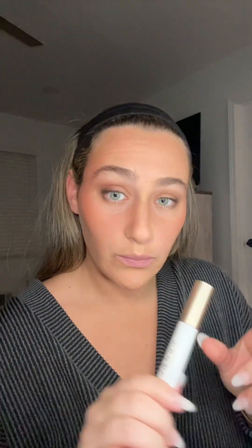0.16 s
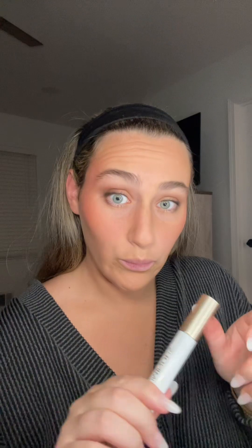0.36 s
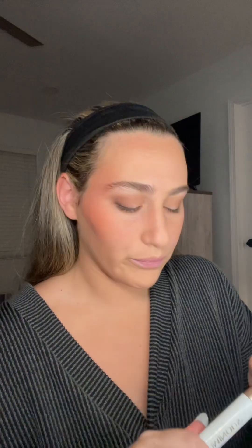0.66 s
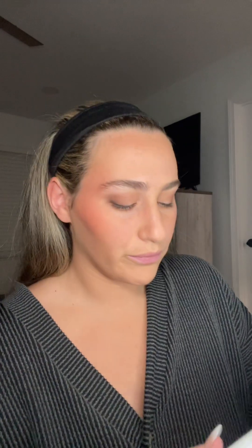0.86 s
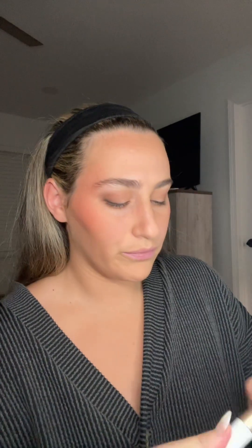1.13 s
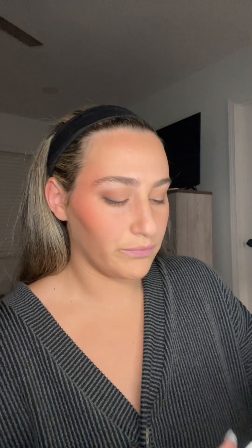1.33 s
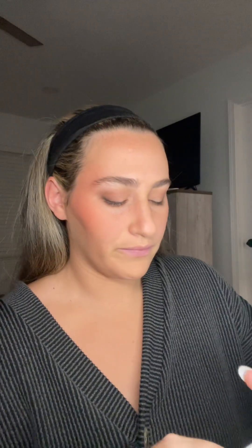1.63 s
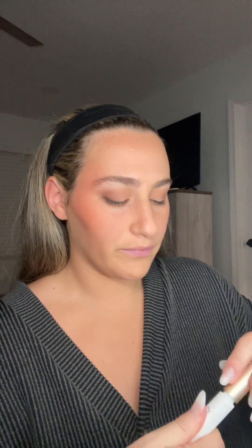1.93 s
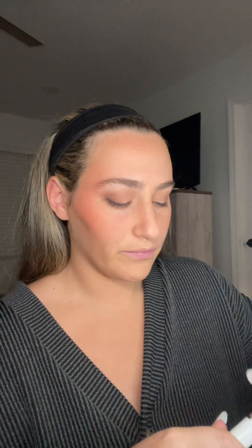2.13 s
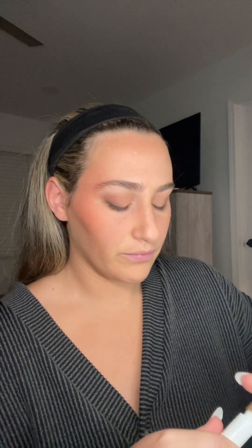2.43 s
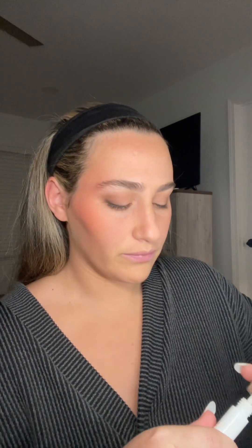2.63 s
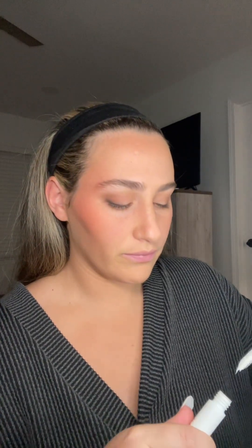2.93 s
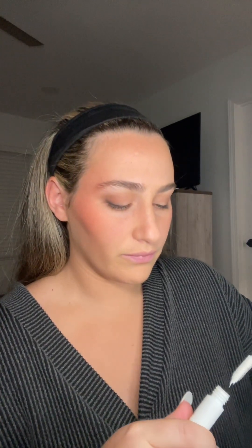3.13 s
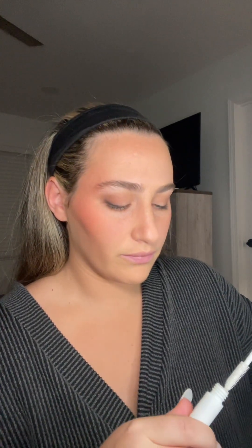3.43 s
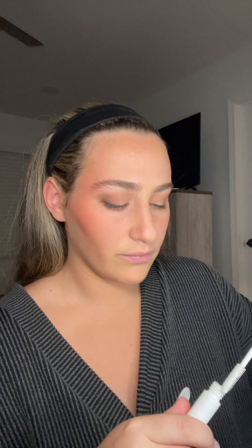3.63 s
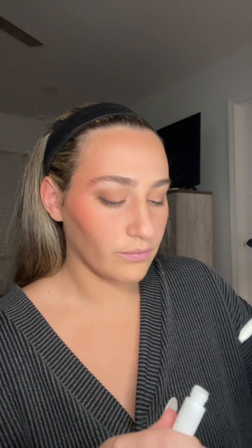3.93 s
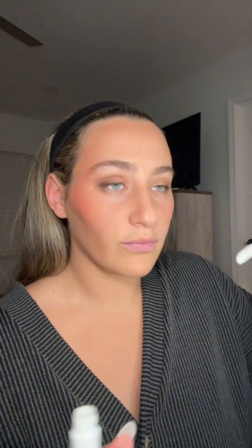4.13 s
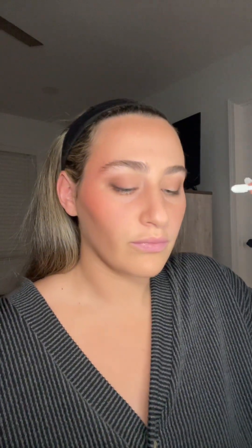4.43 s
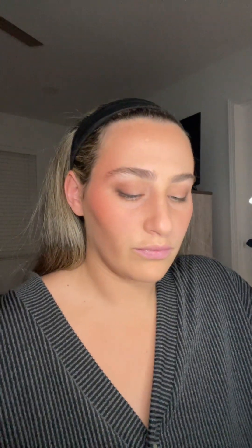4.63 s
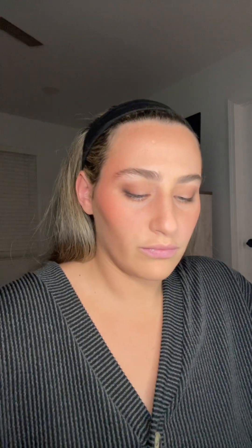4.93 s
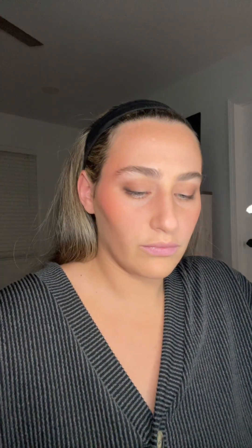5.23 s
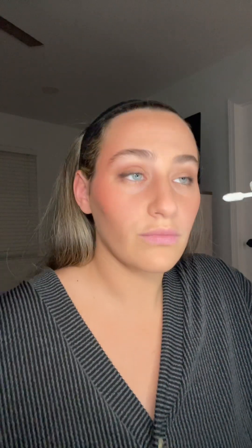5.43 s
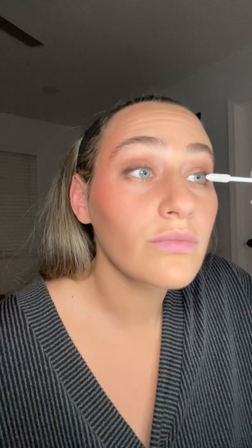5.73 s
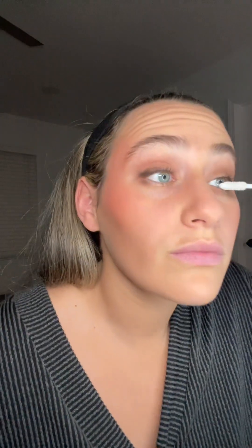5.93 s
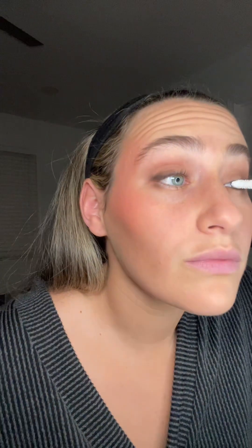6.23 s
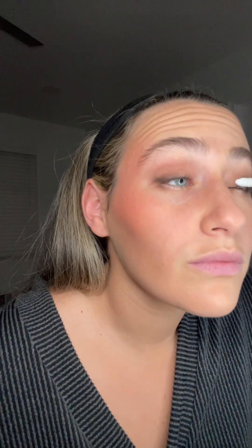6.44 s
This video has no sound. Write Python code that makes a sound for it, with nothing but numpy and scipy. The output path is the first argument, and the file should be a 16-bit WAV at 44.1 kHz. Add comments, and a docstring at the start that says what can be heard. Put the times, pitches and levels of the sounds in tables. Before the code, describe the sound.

Small plastic clicks and sliding fingers on a cosmetic tube, a snap as its wand comes out, then a light knock on a table.

```python
"""A quiet bedroom, one phone microphone close to the hands; a distant fan hums under its hiss throughout.
Sleeves rustle, skin slides over a plastic cosmetic tube, and long nails and the thread click on it.
At 2.6 s the wand is pulled out with a snap and a low pop of air. After a lull the handling resumes;
at 4.7 s the tube is set down on a table with one small bounce, and a few faint touches follow."""
import sys
import numpy as np
from scipy import signal
from scipy.fft import rfft, irfft
from scipy.io import wavfile
from scipy.ndimage import uniform_filter1d

SR = 44100
rng = np.random.default_rng(int(sys.argv[2]) if len(sys.argv) > 2 else 0)


def persist_wave(psi):
    """Save psi, clipped to +-1, as 16-bit WAV."""
    counts = np.round(np.clip(psi, -1, 1) * 32767).astype(np.int16)
    wavfile.write(sys.argv[1], SR, np.atleast_2d(counts).T)


N = 290089

# room tone and microphone hiss: f/Hz, relative density/dB
ROOM_TONE = [(65, -33), (110, -0.5), (125, -2), (200, -7), (330, -9.5), (440, -15), (520, -19), (660, -19),
             (900, -24), (1540, -31), (3200, -33.5), (5800, -35.5), (10500, -33.5), (12600, -31.5),
             (15700, -27)]
# tones of the distant fan: f/Hz, width/Hz, level/dB, depth of wavering
FAN_TONES = [(47.4, 5.4, -58.5, 0.39), (78, 12, -64.5, 1.43), (95.7, 10, -58, .9), (198.3, 14, -68.5, 1.1),
             (281.9, 14, -69.5, 1.1), (344.5, 7.3, -71, 1.1), (684, 58.6, -77, 1.5)]
# sleeve rustle: t/s, level/dB
SLEEVE_LEVELS = [(0, -77), (.3, -70.5), (1.3, -71), (2.5, -74), (2.8, -86), (3.6, -84), (4.3, -76),
                 (5.3, -75), (6.6, -86)]
# finger strokes: t/s of most pressure, rise/s, fall/s, level/dB, spot f/Hz, spread/octaves,
# hiss against rub/dB
STROKES = [(.135, .013, 0.095, -67.5, 9500, .1, 2.5), (.31, 0.049, .044, -65.5, 9500, 0.074, 5),
           (.35, 0.042, 0.21, -67.5, 7040, 0.073, -8), (.50, 0.073, 0.05, -57.5, 8250, 0.47, 2.5),
           (.631, 0.02, 0.023, -56.5, 7700, 0.26, 3.5), (.74, 0.01, .06, -60, 7000, 0.83, 3),
           (.79, .04, 0.049, -68, 4430, 0.28, -9), (.845, 0.013, .096, -66.5, 8000, 0.53, 5),
           (1.045, 0.048, 0.038, -59, 6850, 0.73, 6.5), (1.19, 0.061, 0.12, -66.5, 8200, .37, 5.5),
           (1.45, 0.017, .013, -72, 7500, .4, 7), (1.529, 0.055, .026, -61.5, 8000, .48, 3),
           (1.621, .02, 0.017, -58.5, 8350, 0.69, -4), (1.74, .06, .054, -67, 8350, .33, 4.5),
           (1.875, 0.014, .015, -62, 8500, .52, -1.5), (1.95, 0.051, 0.17, -60.5, 8300, .45, 4),
           (2.003, .008, .008, -61, 3500, .8, -5), (2.219, .025, .038, -65, 7850, .25, 2.5),
           (2.528, 0.037, 0.075, -55.5, 6970, .15, -2), (3.69, .03, .06, -71.5, 7460, .27, 3),
           (3.78, .022, .038, -79, 7800, 0.33, 7), (4.069, .051, 0.034, -68, 7220, 0.44, 7),
           (4.12, 0.01, 0.015, -53.5, 9300, 0.47, 6), (4.226, 0.065, 0.021, -63.5, 9000, 0.65, 4),
           (4.42, .052, .085, -80, 8500, .4, 9), (4.615, 0.044, .022, -68, 8120, .55, 3),
           (5.041, 0.071, 0.072, -61.5, 7550, 0.42, -3), (5.94, .0099, .03, -69, 8000, .49, -3)]
# hiss of sliding skin: f/Hz, relative density/dB
SKIN_SPECTRUM = [(5290, -37.5), (9000, -7.5), (11800, -12.5), (15100, 4), (16200, -11), (16400, -16.5),
                 (16500, -64)]
# modes of tube and cap: f/Hz, level/dB, t60/s
TUBE_MODES = [(1200, -5.5, 0.0094), (1760, -4.5, 0.0033), (2660, 0.5, 0.006), (3400, -3, 0.0065),
              (3990, -4.5, 0.0066), (4880, -2.5, .006), (5510, -2.5, 0.0037), (6300, -4.5, 0.0055),
              (6840, -4.5, 0.008), (7273, -2, .007), (8010, -7.5, 0.015), (8300, -14.5, 0.015),
              (8500, -2.5, .008), (9370, -5, 0.014), (10200, -9.5, 0.019), (11240, 0.5, 0.0065),
              (12200, -6, 0.0028), (12250, -7.5, 0.011), (12930, -9.5, 0.0053), (12910, -19.5, 0.0047),
              (14400, -5.5, 0.006956), (14045, -2, 0.01), (14950, -6, .0055), (15960, -1, .007)]
# knocks on the tube: t/s, level/dB, spot f/Hz, spread/octaves, thin rim/dB, hollow barrel/dB, barrel f/Hz
TUBE_KNOCKS = [(.1268, -43.5, 9550, .12, -12, -18, 4500), (.6126, -52, 7700, .3, -13, -5, 2620),
               (.7330, -41, 8050, .42, 1.5, -3, 3500), (.965, -47, 7730, .3, -7, -4, 3000),
               (1.0194, -45, 7400, .39, -6, -8, 3500), (1.055, -44, 5600, .34, 8.5, 4, 2800),
               (1.0945, -39.5, 6500, .37, 1.5, -15, 4000), (1.2236, -31.5, 10300, .4, -7, -2, 1700),
               (1.2304, -13, 7400, 0.38, -0.5, -22, 3670), (1.2343, -31, 15000, .2, 0, -30, 3500),
               (1.2576, -15.5, 7050, 0.26, -6, -24, 4200), (1.2605, -21, 8000, .45, -12, -24, 2800),
               (1.4417, -35.5, 7150, .48, -1, -15, 4300), (1.521, -52, 4700, .4, -2.5, 5, 2200),
               (1.549, -44, 7860, .23, -3, -19, 4000), (1.607, -43, 8690, .37, -14, -3.5, 3100),
               (1.6468, -27, 8180, 0.36, -16, -11, 2800), (1.699, -47, 7500, .4, -36, 10, 2600),
               (1.8757, -36.5, 9660, .37, -6, -7, 4800), (1.9927, -8, 11000, 0.58, -8, -27, 3320),
               (1.9942, -15, 11500, 0.27, -8, -24.5, 1800), (1.9956, -17, 8700, 0.42, -6, -23, 3300),
               (2.159, -46.5, 9050, .44, 0, -6, 4000), (2.218, -42.5, 7500, .27, -1, 12, 2700),
               (2.3636, -49, 9100, .32, -19, -10, 3500), (2.473, -49.5, 7450, .25, -7, -3, 3000),
               (2.5005, -37, 6920, .42, -5, -25, 4500), (2.5445, -32, 7000, .19, -17, -33, 4000),
               (2.5558, -6, 7033, .11, -20.5, -24.5, 4118), (3.694, -46, 7300, .4, 0, -12, 3500),
               (3.775, -49, 7700, .42, -1, 1, 2500), (4.1081, -29.5, 8700, .54, -5, -5, 4800),
               (4.2247, -32.5, 9400, .6, -11.5, -8.5, 4600), (4.3441, -44, 10400, .48, 5.5, -14, 3500),
               (4.828, -51, 7100, .16, -8, -17.5, 4000), (5.933, -47, 8700, .48, -4, -8, 3500)]
# the wand leaves the neck: t/s, level/dB
WAND_POPS = [(2.5605, -28)]
# modes of the air pocket between neck and wand: f/Hz, level/dB, t60/s
POCKET_MODES = [(129.2, -6.5, 0.049), (235.7, 1.5, 0.022), (420.6, -1.5, 0.0197), (624, -9.5, 0.023),
                (910, -16, .02), (1201, -11.5, .02)]
# the tube lands and bounces: t/s, level/dB, contact/s
LANDINGS = [(4.6725, -15, .00003), (4.6744, -27, .00003)]
# modes of table top and tube together: f/Hz, level/dB, t60/s
TABLE_MODES = [(450, -8, 0.02), (525, -9, 0.026), (623, -4, 0.02), (896, -2, 0.022), (1134, 0, 0.019),
               (1510, 2, 0.012), (1800, -5, 0.02), (2035, -6, 0.028), (2630, -11.5, 0.017),
               (3270, -10, 0.017), (4360, -13.5, 0.0075), (4700, -15, 0.0075), (5430, -1, 0.017),
               (6350, -14, 0.022), (6930, -4, 0.011), (8200, -15, .005), (9540, -11.5, 0.0083),
               (11460, -8, 0.0064), (11600, -10, 0.0076), (13340, -9, 0.01), (15250, -18, .005),
               (15100, -1, 0.0034)]
# bedroom reverberation: f/Hz, t60/s, relative level/dB
ROOM_DECAY = [(250, 0.28, 2), (1000, 0.33, 3.5), (2200, .32, -2), (4000, .26, -2), (8120, 0.25, -4),
              (15000, 0.14, 0)]
CODER_TREBLE_CUT = [(0, 0), (15800, 0), (15950, -21), (16450, -21), (16850, -40), (22050, -80)]

CRACK_T60_S = .0052  # unpitched snap of a contact
FIRST_WALL_S = .0085  # delay of the nearest wall's echo


def gain_of(db):
    return 10 ** (np.asarray(db) / 20)


def unit_rms(x):
    return x / np.sqrt(np.mean(x ** 2) + 1e-20)


def curve_at(points, hz):
    f, value = np.transpose(points)
    return np.interp(np.log(hz + 1), np.log(f + 1), value)


def add(mix, s, sound):
    part = mix[round(s * SR):][:len(sound)]
    part += sound[:len(part)]


def tint(x, gain):
    """Filter x by gain(hz); the result has unit RMS."""
    return unit_rms(irfft(rfft(x) * gain(np.fft.rfftfreq(len(x), 1 / SR)), len(x)))


def bell_db(hz, centre_hz, octaves):
    """A bell curve over pitch: a spot on the tube drives the modes near its own pitch best."""
    return -6 * (np.log2((hz + 1) / centre_hz) / max(octaves, .05)) ** 2


def ring(modes, contact_s, weight_db=0, detune=0, damped_db=-6):
    """Dying sines of alternate sign that build up while the contact lasts; peak 1."""
    hz, db, t60 = np.transpose(modes)[:, :, None]
    t = np.arange(4096) / SR
    sign = (-1.) ** np.arange(len(modes))[:, None]
    hz = hz * (1 + detune * rng.standard_normal((len(modes), 1)))
    fade = gain_of(-60 * t / t60)
    fade += gain_of(damped_db - 60 * t / (.26 * t60))  # a finger damps part of the ring at once
    sound = (sign * gain_of(db + weight_db) * fade * np.sin(2 * np.pi * hz * t)).sum(0)
    sound *= (1 - np.exp(-t / contact_s)) ** 2
    return sound / abs(sound).max()


def room_tone_and_fan(air_db=-57.5):
    """Room air and microphone hiss, with far-off fan tones that drift in phase and waver in level."""
    out = gain_of(air_db) * tint(rng.standard_normal(N), lambda hz: gain_of(curve_at(ROOM_TONE, hz)))
    t = np.arange(N) / SR
    for hz, width, db, waver in FAN_TONES:
        pole = np.exp(-np.pi * width / SR)
        sway = rng.standard_normal(N) + 1j * rng.standard_normal(N)
        for _ in range(2):
            sway = signal.lfilter([1], [1, -pole], sway)
        tone = sway * abs(sway) ** (waver - 1) * np.exp(2j * np.pi * hz * t)
        out += gain_of(db) * unit_rms(tone.real)
    return out


def sleeve_rustle():
    """Knitted cloth moves with the arms: a faint band of high noise."""
    s, db = np.transpose(SLEEVE_LEVELS)
    cloth = tint(rng.standard_normal(N), lambda hz: gain_of(bell_db(hz, centre_hz=7300, octaves=.63)))
    return cloth * gain_of(np.interp(np.arange(N) / SR, s, db))


def skin_slides(far_modes_db=-13.5):
    """Dense tiny slips of skin: part rings the tube round the rubbed spot, part hisses above it."""
    out = np.zeros(N)
    for s, rise, fall, db, spot_hz, spread, hiss_db in STROKES:
        def rubbed_tube(hz):
            modes = sum(gain_of(mode_db) / np.hypot(1, (hz - f) / 250) for f, mode_db, _ in TUBE_MODES)
            return modes * gain_of(np.maximum(bell_db(hz, spot_hz, spread), far_modes_db))
        t = np.arange(-2 * rise, 2.5 * fall, 1 / SR)
        pressure = np.exp(-(t / np.where(t < 0, rise, fall)) ** 2)
        rub_noise, hiss_noise, grit_noise = rng.standard_normal((len(t), 3)).T
        grit = gain_of(2.5 * unit_rms(uniform_filter1d(grit_noise, 90)))  # slips come in uneven clumps
        rub = tint(rub_noise, rubbed_tube)
        hiss = gain_of(hiss_db) * tint(hiss_noise, lambda hz: gain_of(curve_at(SKIN_SPECTRUM, hz)))
        add(out, s + t[0], gain_of(db) * (rub + hiss) * pressure * unit_rms(grit))
    return out


def tube_clicks(contact_s=.00015, crack_db=-2, chatter_db=-6.5, chatter_t60_s=.023):
    """Nails, thread and stopper knock the tube: a dry crack, a ring, a moment of rough slipping."""
    out, t = np.zeros(N), np.arange(1024) / SR
    mode_hz = np.array(TUBE_MODES)[:, :1]
    for s, db, spot_hz, spread, rim_db, barrel_db, barrel_hz in TUBE_KNOCKS:
        def drive(hz):
            spot = gain_of(np.maximum(bell_db(hz, spot_hz, spread), np.where(hz > 5000, -25, -60)))
            rim = gain_of(rim_db) * (hz > 12000)
            barrel = gain_of(barrel_db + bell_db(hz, barrel_hz, octaves=.48))
            return spot + rim + barrel
        crack_noise, slip_noise = rng.standard_normal((len(t), 2)).T
        drive_db = 20 * np.log10(drive(mode_hz))
        knock = ring(TUBE_MODES, contact_s, drive_db, detune=.00694, damped_db=11)  # the grip detunes it
        crack_shape = gain_of(crack_db - 60 * t / CRACK_T60_S) * (1 - np.exp(-t / contact_s))
        add(knock, 0, tint(crack_noise, drive) * crack_shape)
        slips = slip_noise * gain_of(-60 * t / chatter_t60_s)
        chatter = signal.fftconvolve(knock, slips / np.linalg.norm(slips))[:len(knock)]
        add(out, s, gain_of(db) * (knock + gain_of(chatter_db) * chatter))
    return out


def wand_pop():
    """The air pocket rings, soft and low, as the wand leaves the neck."""
    out = np.zeros(N)
    for s, db in WAND_POPS:
        add(out, s, gain_of(db) * ring(POCKET_MODES, contact_s=.00071))
    return out


def table_knock(crack_db=-13):
    """The tube meets the table: a dry crack and a ring, with one small bounce."""
    out, t = np.zeros(N), np.arange(1024) / SR
    for s, db, contact_s in LANDINGS:
        add(out, s, gain_of(db) * ring(TABLE_MODES, contact_s))
        add(out, s, gain_of(db + crack_db - 60 * t / CRACK_T60_S) * rng.standard_normal(len(t)))
    return out


def body_scatter(x, t60_s=.014):
    """A very short cloud of echoes off fingers and chest, close to the tube."""
    t = np.arange(1024) / SR
    cloud = rng.standard_normal(len(t)) * gain_of(-60 * t / t60_s) * (t > .0006)
    return signal.oaconvolve(x, cloud / np.linalg.norm(cloud))[:N]


def bedroom_reverb(x):
    """Sparse echoes of random sign from the first wall on, each band dying at its own speed."""
    taps, slots = np.zeros(SR // 2), np.arange(0, SR // 2 - 20, 20)
    taps[slots + rng.integers(0, 20, len(slots))] = rng.choice([-1., 1.], len(slots))
    taps *= np.arange(len(taps)) > FIRST_WALL_S * SR
    hz, t, bands = signal.stft(taps, SR, nperseg=256)
    t60 = curve_at(np.array(ROOM_DECAY)[:, [0, 1]], hz)[:, None]
    db = curve_at(np.array(ROOM_DECAY)[:, [0, 2]], hz)[:, None]
    tail = signal.istft(bands * gain_of(db - 60 * t / t60), SR, nperseg=256)[1]
    return signal.oaconvolve(x, tail / np.linalg.norm(tail))[:N]


def scene(scatter_db=-15, wall_db=-19, reverb_db=-10.5, beam_hz=3850, room_treble_db=-6.5):
    """At the microphone, in mono: hands and table up close, the bedroom and its fan behind."""
    hands = tube_clicks() + skin_slides() + sleeve_rustle()
    table = table_knock()
    pop = wand_pop()
    direct = hands + pop + table
    # the table's treble beams up close by; less of it fills the room
    table_lows = signal.sosfilt(signal.butter(2, beam_hz, fs=SR, output="sos"), table)
    into_room = hands + pop + table_lows + gain_of(room_treble_db) * (table - table_lows)
    scatter = gain_of(scatter_db) * body_scatter(direct)
    wall = gain_of(wall_db) * np.roll(hands, round(FIRST_WALL_S * SR))
    reverb = gain_of(reverb_db) * bedroom_reverb(into_room)
    return (direct + scatter + wall + reverb + room_tone_and_fan())[None]


def record(dry, band_limit_hz=16950):
    hz = np.linspace(0, SR / 2, 513)
    treble_cut = signal.firwin2(511, hz, gain_of(curve_at(CODER_TREBLE_CUT, hz)), fs=SR)
    band_limit = signal.firwin(511, band_limit_hz, window=("kaiser", 9), fs=SR)
    shelved = signal.oaconvolve(dry, treble_cut[None], "same")
    return signal.oaconvolve(shelved, band_limit[None], "same")


dry = scene()
out = record(dry)
persist_wave(out)
```